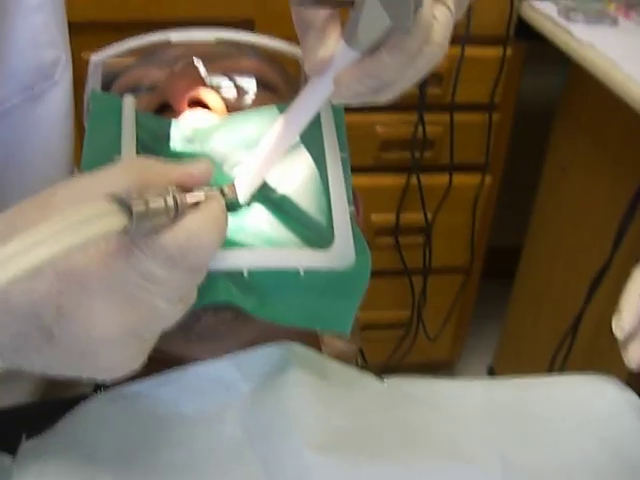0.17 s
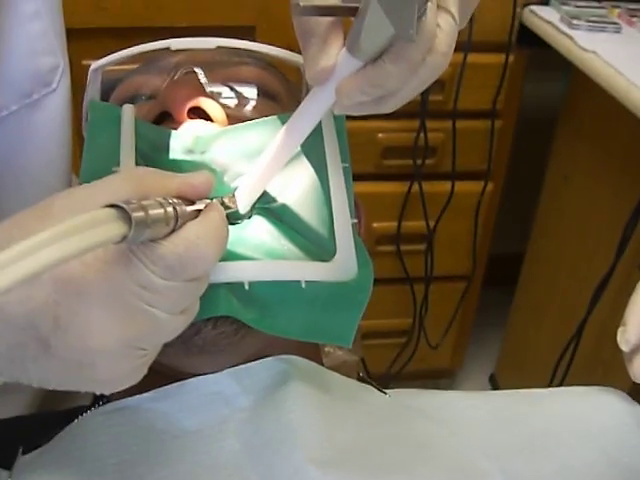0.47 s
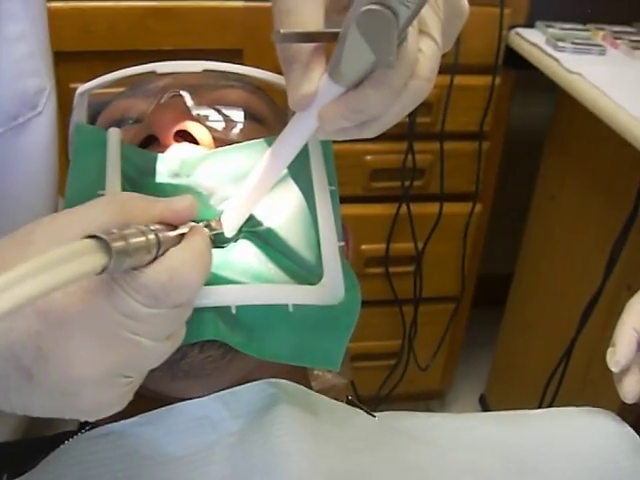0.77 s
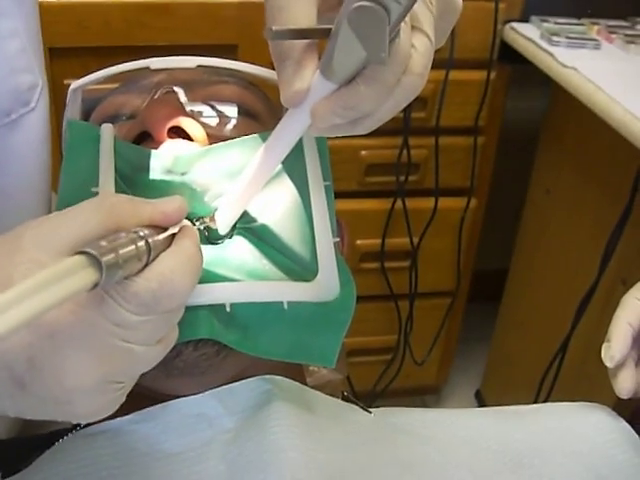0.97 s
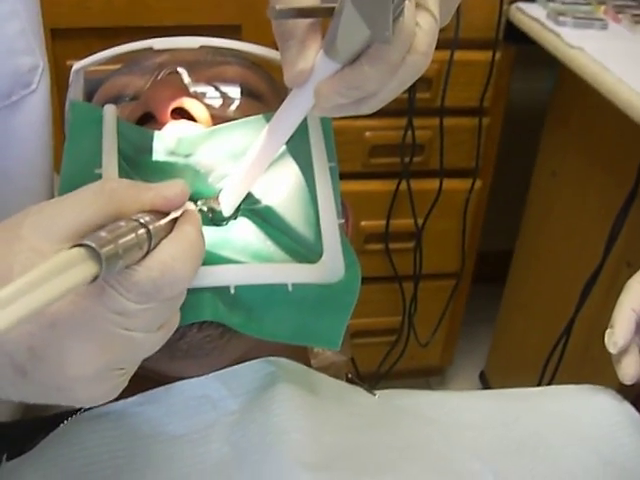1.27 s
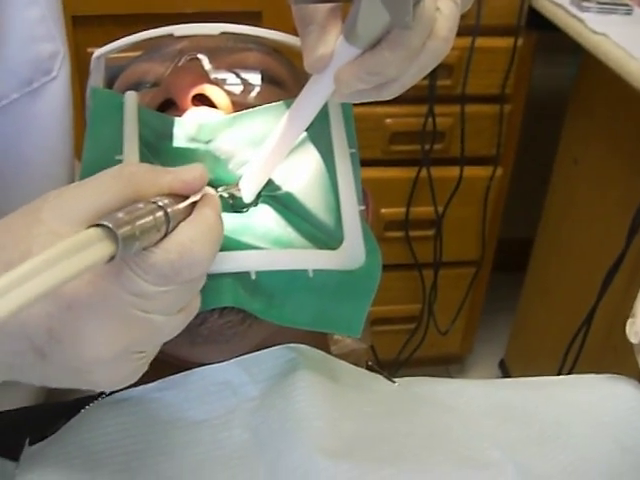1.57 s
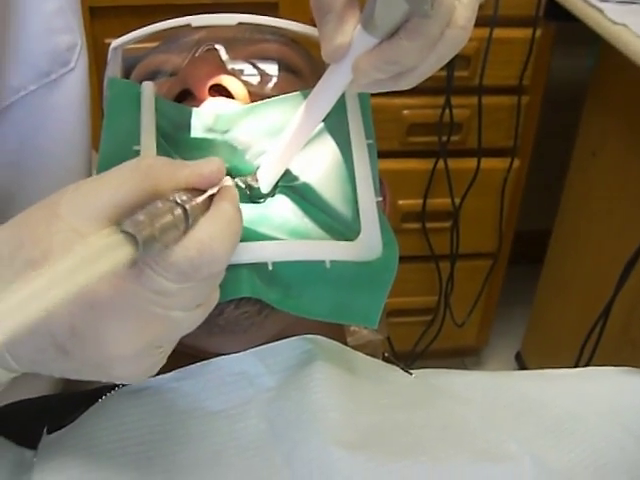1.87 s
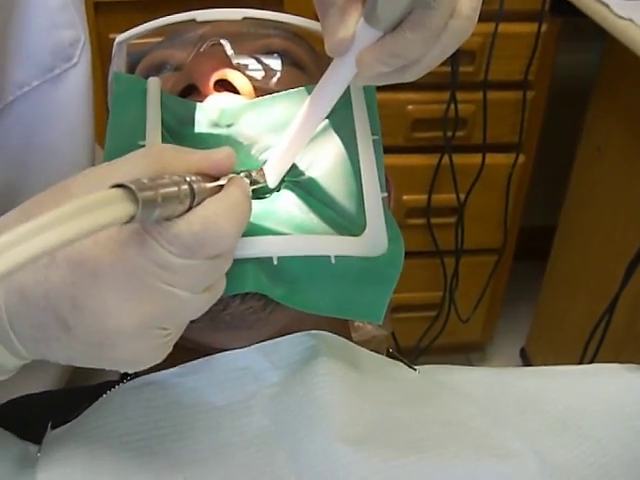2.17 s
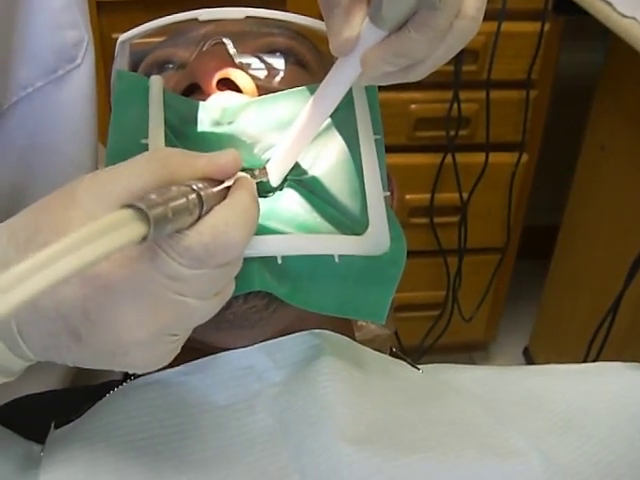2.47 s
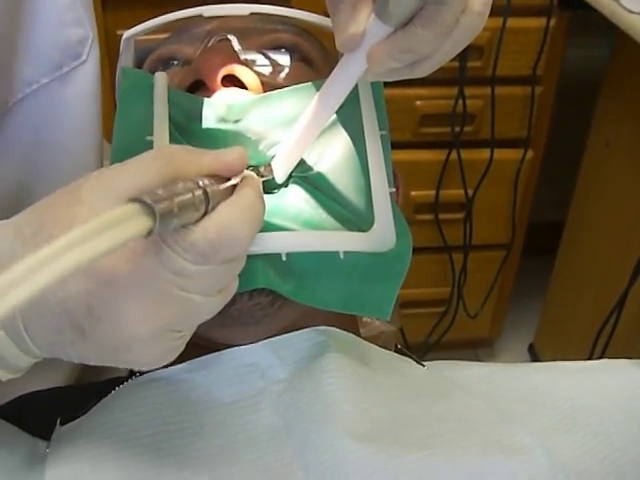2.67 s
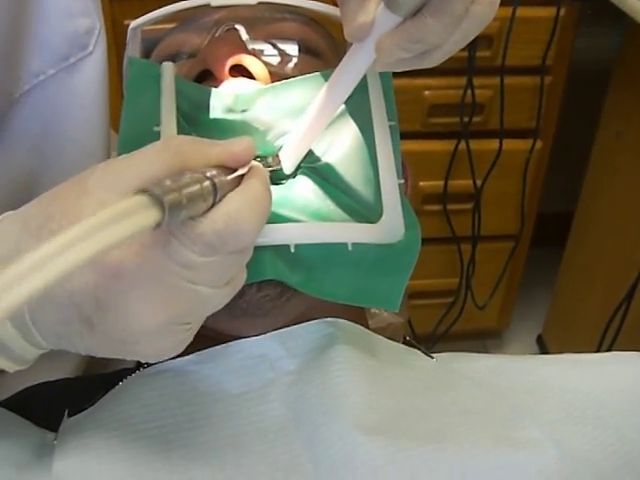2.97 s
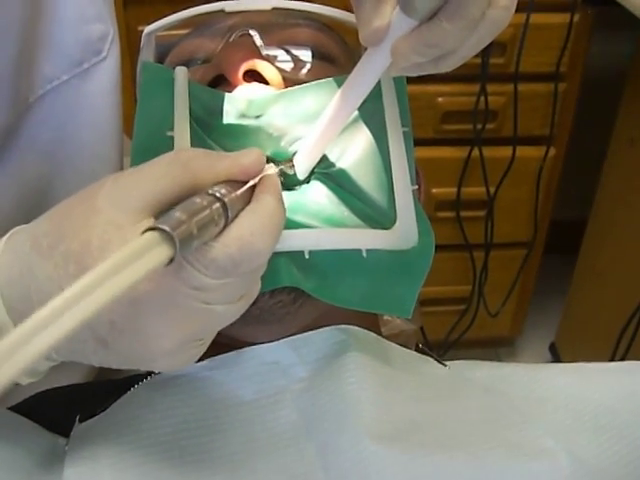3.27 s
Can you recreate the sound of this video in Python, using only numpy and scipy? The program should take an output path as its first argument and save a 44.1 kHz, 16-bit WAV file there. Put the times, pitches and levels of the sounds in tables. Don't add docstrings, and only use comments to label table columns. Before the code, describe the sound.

A dental drill whines shrilly, sagging and recovering in pitch over hissing spray and suction roar.

```python
import sys
import numpy as np
from scipy import signal
from scipy.fft import rfft, irfft, next_fast_len
from scipy.io import wavfile
from scipy.ndimage import uniform_filter1d, map_coordinates

SR = 44100
rng = np.random.default_rng(int(sys.argv[2]) if len(sys.argv) > 2 else 0)


def level_to_linear(level):
    exponent = np.asarray(level, float) / 20
    return 10 ** exponent


def digitize_waveform(pressure):
    field = np.atleast_2d(pressure).T
    bounded = np.clip(field, -1, 1)
    quanta = np.round(bounded * 32767).astype(np.int16)
    wavfile.write(sys.argv[1], SR, quanta)


N = 150381
T = np.arange(N) / SR


def unit(x):
    return x / np.sqrt(np.mean(x ** 2) + 1e-20)


def along(points, hz):
    f, v = np.transpose(points)
    return np.interp(np.log(hz + 1), np.log(f + 1), v, left=-120, right=-120)


def wobble(rate):
    return map_coordinates(rng.standard_normal(int(N * rate / SR) + 4), [T * rate])


def filtered(x, response):
    m = next_fast_len(N + SR // 2)
    return irfft(rfft(x, m) * response(np.fft.rfftfreq(m, 1 / SR)), m)[..., :N]


def rush(response, patchy_db):
    z = signal.stft(rng.standard_normal(N), nperseg=512)[2]
    field = rng.standard_normal(z.shape)
    field = uniform_filter1d(uniform_filter1d(field, 8, 0), 12, 1)
    patchy = signal.istft(z * level_to_linear(patchy_db * unit(field)), nperseg=512)[1][:N]
    return unit(filtered(patchy, response))


# (time [s], level [dB], decay [s])
THUMPS = [
    (.036, -49, 0.12),
    (0.057, -29, 0.014),
    (0.22, -24, .002),
    (.281, -31, .008),
]


def thumps():
    total = np.zeros(N)
    for s, db, decay in THUMPS:
        u = np.clip(T - s, 0, None)
        total = total - level_to_linear(db) * np.exp(-u / decay) * (1 - np.exp(-u / 0.0014))
    return total


WAKE_S, WAKE_DB, WAKE_RISE_S = 0.056, -10.5, 0.12


def waking_gain():
    remaining = np.clip(1 - (T - WAKE_S) / WAKE_RISE_S, 0, 1)
    return (T > WAKE_S) * level_to_linear(WAKE_DB * remaining)


# (time [s], turbine speed [Hz], whine level [dB])
STROKES = [
    [(.05, 6420, -29), (.13, 6340, -29), (.19, 6350, -26), (.285, 6180, -28), (.35, 6490, -20.5),
     (.42, 6655, -25), (.52, 6600, -26.5), (.58, 5940, -31)],
    [(.635, 5620, -36), (.68, 5900, -27), (.745, 6370, -24), (.82, 6130, -28), (.88, 5800, -36),
     (.935, 5630, -42)],
    [(.975, 5620, -23), (1.03, 5580, -35), (1.09, 5520, -34.5), (1.155, 5610, -31), (1.205, 5665, -25.5),
     (1.235, 5740, -34), (1.27, 5750, -28), (1.32, 5810, -31)],
    [(1.368, 5570, -22), (1.405, 5950, -19), (1.47, 6350, -21), (1.535, 6570, -22.5), (1.62, 6385, -23.5),
     (1.69, 6530, -18.5), (1.74, 6530, -28), (1.82, 6560, -25), (1.885, 6130, -21.5)],
]
# (time [s], turbine speed [Hz], whine level [dB])
LATER_STROKES = [
    [(1.94, 5920, -23.5), (2.02, 6350, -19.5), (2.11, 6520, -21.5), (2.3, 6487, -18.5), (2.37, 6410, -29),
     (2.47, 6000, -27.5), (2.515, 5845, -42), (2.55, 5780, -29)],
    [(2.59, 5910, -27.5), (2.64, 6240, -20), (2.69, 6420, -20), (2.79, 6453, -22.5), (2.85, 6340, -24),
     (3.05, 6500, -19.5), (3.085, 6410, -40), (3.115, 6200, -42)],
    [(3.135, 6180, -21), (3.19, 6310, -21), (3.27, 6050, -23.5), (3.345, 6010, -19.5), (3.37, 6050, -25),
     (3.41, 6360, -12.5)],
]
INERTIA_S, JITTER_HZ = .028, 10.1
FREE_HZ, STALL_HZ = 6600, 5670


def rotor():
    s, hz, db = np.transpose(np.concatenate([*STROKES, *LATER_STROKES]))
    size = int(INERTIA_S * SR)
    hz = np.interp(T, s, hz)
    hz = uniform_filter1d(uniform_filter1d(hz, size), size)
    turn = 2 * np.pi * np.cumsum(hz + JITTER_HZ * wobble(150)) / SR
    load = np.clip((FREE_HZ - hz) / (FREE_HZ - STALL_HZ), 0, 1)
    return turn, np.interp(T, s, db), load


# (time [s], depth [dB])
BREAKS = [(.225, 9), (.385, 11), (.475, 9), (.93, 8), (1.04, 9), (1.15, 8), (1.235, 9), (1.555, 8),
          (1.875, 4), (1.92, 8), (2.825, 12), (2.91, 4), (3.364, 10)]
BREAK_S = 0.0085
OCTAVE_DB, OCTAVE_LOAD_DB, FLUTTER_DB = -34, .5, 3


def whine(turn, db, load):
    choke_db = sum(depth * np.exp(-((T - s) / BREAK_S) ** 2) for s, depth in BREAKS)
    tone_db = db - choke_db + FLUTTER_DB * load * wobble(45) + 1.37 * wobble(30.08)
    octave_db = .35 * db + OCTAVE_DB + OCTAVE_LOAD_DB * load + 1.4 * wobble(22.2)
    return np.sqrt(2) * (level_to_linear(tone_db) * np.sin(turn) + level_to_linear(octave_db) * np.sin(2 * turn))


# (time [s], pressure as level of hiss [dB])
PRESSURE = [(0.25, -22), (0.35, -23.5), (0.55, -22.5), (0.56, -21), (0.73, -24), (0.92, -20.5),
            (1.67, -24.5), (1.9, -23), (2.21, -26.5), (2.57, -22), (2.66, -26.5), (3.06, -25.5), (3.3, -21),
            (3.41, -26.5)]
# (frequency [Hz], level [dB])
GRIND = [(4000, -41), (5500, 0.5), (8800, 1.5), (11000, 1.5), (12600, -5), (13500, -2), (16000, -18)]
PRESSURE_GROWS, GRIND_DB = 1.73, -26.5
SCRAPE_DB, SCRAPE_HZ = -2.5, 896


def grinding(turn, load):
    s, press = np.transpose(PRESSURE)
    press_db = PRESSURE_GROWS * (np.interp(T, s, press) - press.mean())
    grind_db = GRIND_DB + press_db + 0.52 * wobble(15)
    grind = level_to_linear(grind_db) * rush(lambda f: level_to_linear(along(GRIND, f)), patchy_db=3.0)
    scrape_db = GRIND_DB + SCRAPE_DB + 1.25 * press_db - 7.4 * (1.5 - load)
    return grind + level_to_linear(scrape_db) * wobble(SCRAPE_HZ) * np.sin(2 * turn)


# (time [s], level [dB])
FLOW = [(0.3, -24.5), (0.32, -26), (2.17, -27.5), (2.27, -28), (2.4, -24.5), (2.69, -27.5), (3.19, -26),
        (3.23, -30), (3.37, -28.5), (3.41, -26)]
# (frequency [Hz], width [Hz], level [dB])
TUBE = [(1013, 129, -9.5), (1646, 290, -12), (2454, 270, -0.5), (2836, 485, 0.5), (3430, 176, 0),
        (3740, 370, 1.5), (4340, 470, -7), (4930, 420, 0)]


def suction():
    s, db = np.transpose(FLOW)

    def pipe(f):
        power = sum(level_to_linear(g) ** 2 / (1 + (2 * (f - c) / w) ** 2) ** 1.5 for c, w, g in TUBE)
        return np.sqrt(power)

    flow_db = np.interp(T, s, db) - 0.5 + 0.83 * wobble(14) + 0.53 * wobble(45)
    return level_to_linear(flow_db) * rush(pipe, patchy_db=0.92)


# (frequency [Hz], level [dB])
SPRAY = [(1800, -48), (2400, -13.5), (5500, 0.5), (7000, -1), (9000, 1), (11000, 0), (13500, -9.5),
         (15700, -12)]
SPRAY_DB = -23.5


def spray():
    mist_db = SPRAY_DB + 0.31 * wobble(2.88) + 0.79 * wobble(20)
    return level_to_linear(mist_db) * rush(lambda f: level_to_linear(along(SPRAY, f)), patchy_db=0.5)


# (frequency [Hz], level [dB])
HUM = [(13, -37), (22, -6), (92, -5.5), (140, -3.5), (529, -5.5), (1040, -5), (1210, -5.5), (1920, -5.5),
       (2200, -5.5), (2860, -17), (4840, -120)]
HUM_DB = -40.5
HUM_MODE_HZ, HUM_MODE_WIDTH_HZ, HUM_MODE_DB = 145, 28, 5.5


def clinic():
    def hum(f):
        mode_db = HUM_MODE_DB / (1 + (2 * (f - HUM_MODE_HZ) / HUM_MODE_WIDTH_HZ) ** 2)
        return level_to_linear(along(HUM, f) + mode_db)

    return level_to_linear(HUM_DB) * rush(hum, patchy_db=0.8)


def room(x, t60):
    t = T[:SR // 2]
    tail = rng.standard_normal(len(t)) * level_to_linear(-60 * t / t60)
    return signal.fftconvolve(x, tail / np.linalg.norm(tail))[:N]


NOTCH_HZ, NOTCH_WIDTH_HZ, NOTCH_DEPTH = 7870, 587, 0.92


def housing(x):
    return filtered(x, lambda f: 1 - NOTCH_DEPTH / (1 + (2 * (f - NOTCH_HZ) / NOTCH_WIDTH_HZ) ** 2))


CLICK_S, CLICK_DB, CLICK_HZ, CLICK_WIDTH_S = .2233, -17, 850, 0.00069


def click():
    u = T - CLICK_S
    return level_to_linear(CLICK_DB) * np.exp(-(u / CLICK_WIDTH_S) ** 2) * np.cos(2 * np.pi * CLICK_HZ * u)


# (time [s], half length [s], level [dB])
CHATTER = [
    (0.567, .05, -30),
    (0.847, .04, -29),
    (1.345, .035, -31),
]
CHATTER_HZ = 270


def chatter(turn):
    skips = sum(level_to_linear(g) * np.cos(np.pi / 2 * np.clip((T - s) / half, -1, 1)) for s, half, g in CHATTER)
    return np.sqrt(2) * skips * np.sin(turn + 2 * np.pi * CHATTER_HZ * T)


# (time [s], low edge [Hz], high edge [Hz], level [dB])
STRAYS = [(1.232, 5600, 7500, -27), (1.232, 10300, 12500, -30), (1.278, 4600, 5800, -31),
          (1.371, 13000, 14830, -38), (1.51, 6930, 8360, -37), (1.789, 14700, 15700, -44),
          (3.229, 6850, 8370, -35), (3.229, 9600, 13000, -28)]
STRAY_S = .046


def strays():
    total = np.zeros((2, N))
    for s, lo_hz, hi_hz, db in STRAYS:
        hiss = unit(filtered(rng.standard_normal(N), lambda f: (f > lo_hz) * (f < hi_hz)))
        envelope = np.cos(np.pi * np.clip((T - s) / STRAY_S, -.5, .5))
        total = total + level_to_linear(db) * hiss * envelope * [[1], [-1]]
    return total


ROOM_DB, ROOM_T60 = -14, .2
NEAR_DB, NEAR_T60 = -7.5, 0.16


def scene():
    turn, db, load = rotor()
    tone = whine(turn, db, load) + chatter(turn)
    grind = grinding(turn, load)
    roar = suction()
    roar = (roar + level_to_linear(NEAR_DB) * room(roar, NEAR_T60)) / np.sqrt(1 + level_to_linear(NEAR_DB) ** 2)
    mono = tone + level_to_linear(ROOM_DB) * room(tone, ROOM_T60) + roar + grind + spray() + clinic()
    return np.array([mono, mono])


def low_pass(x):
    return signal.sosfilt(signal.butter(12, 15720, fs=SR, output="sos"), x)


def record(dry):
    x = housing(dry) * waking_gain()
    mix = x + thumps() + click() + strays()
    return low_pass(mix)


dry = scene()
out = record(dry)
digitize_waveform(out)
```